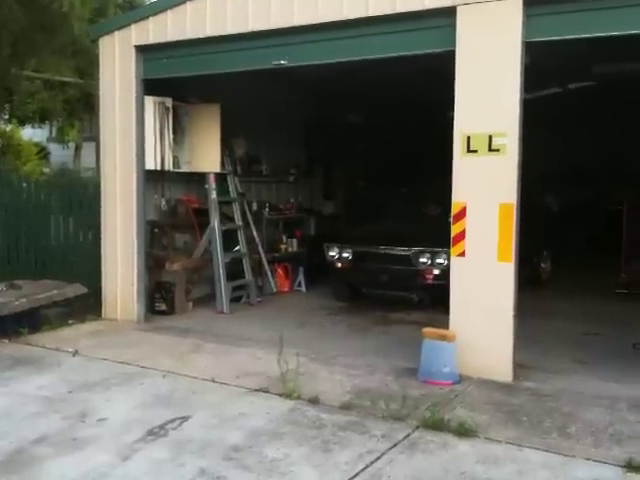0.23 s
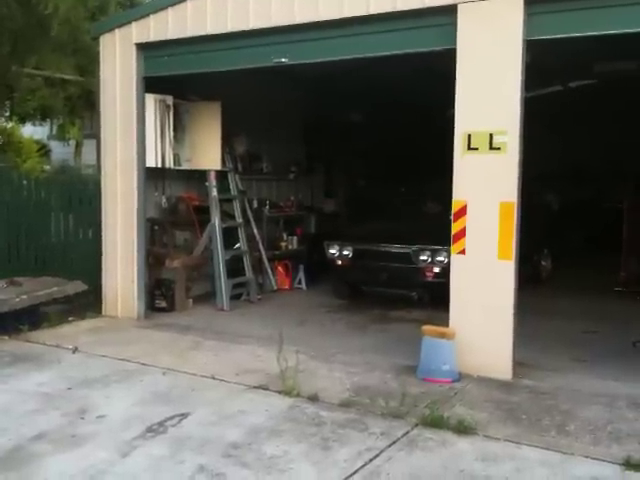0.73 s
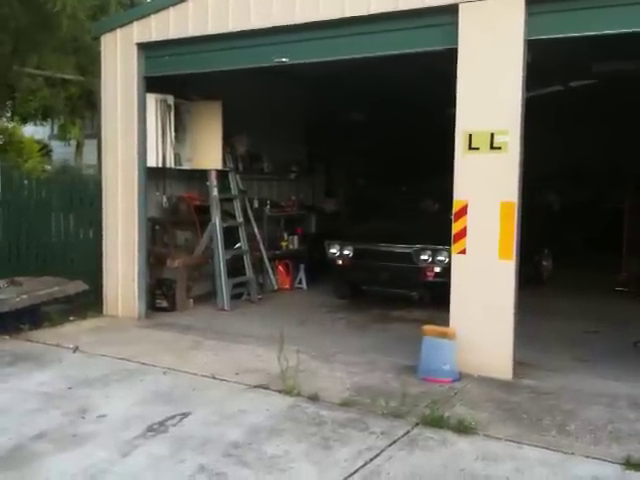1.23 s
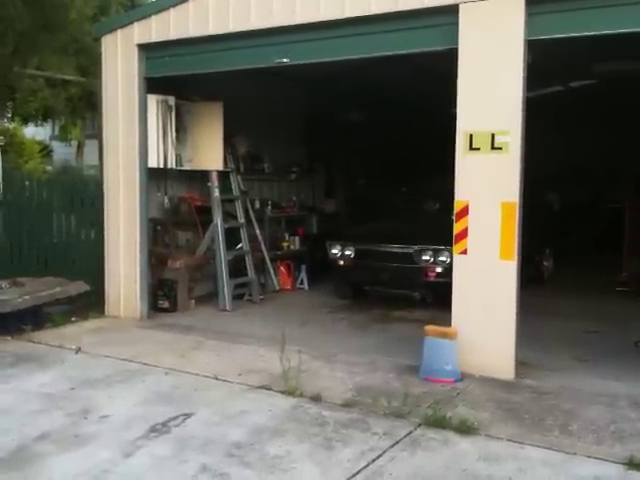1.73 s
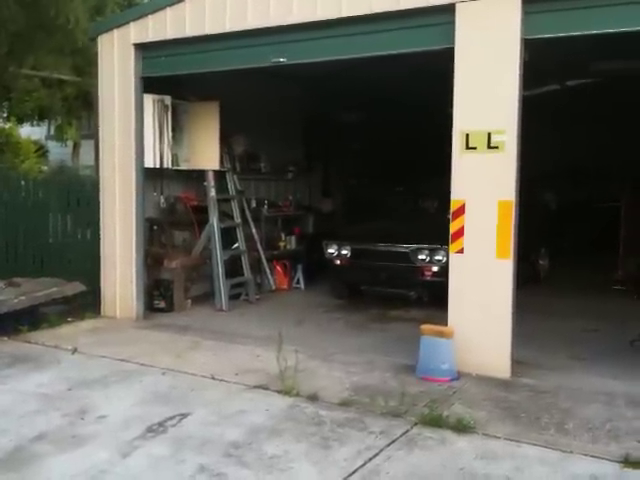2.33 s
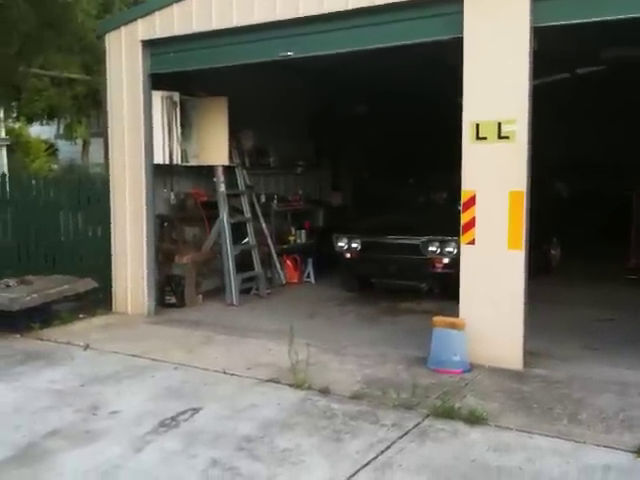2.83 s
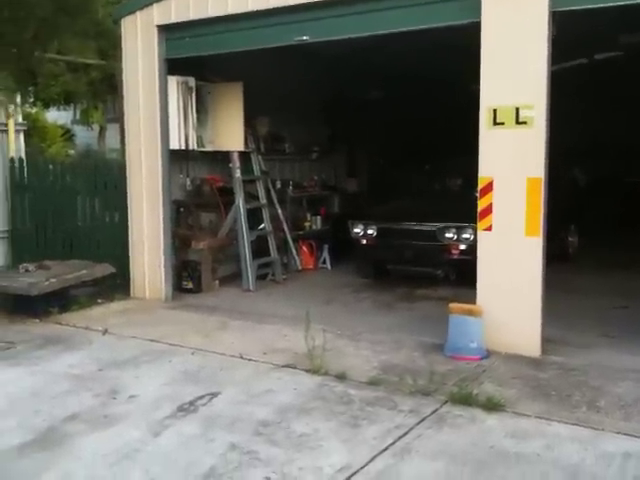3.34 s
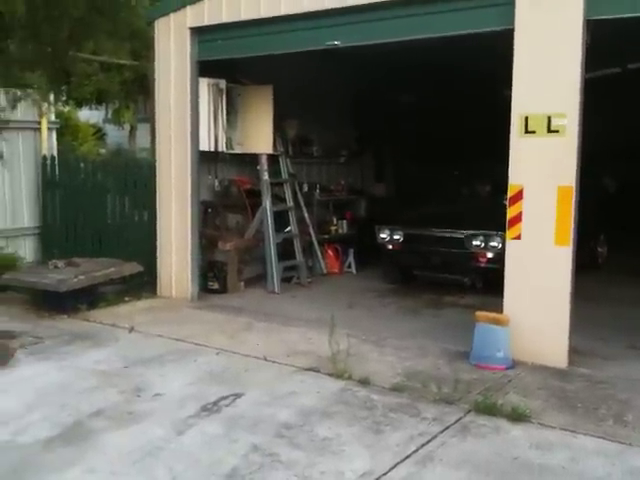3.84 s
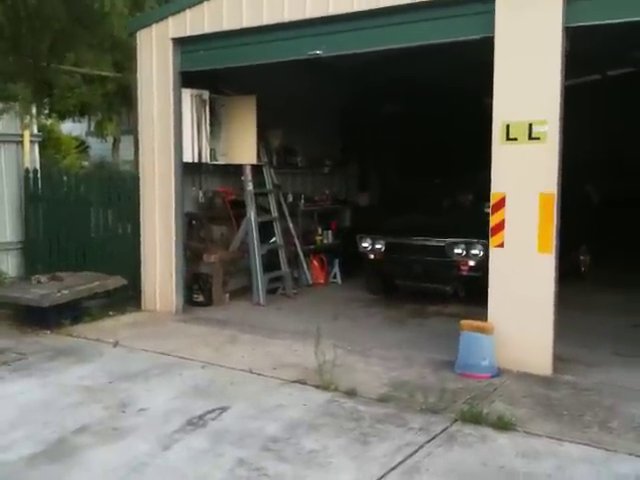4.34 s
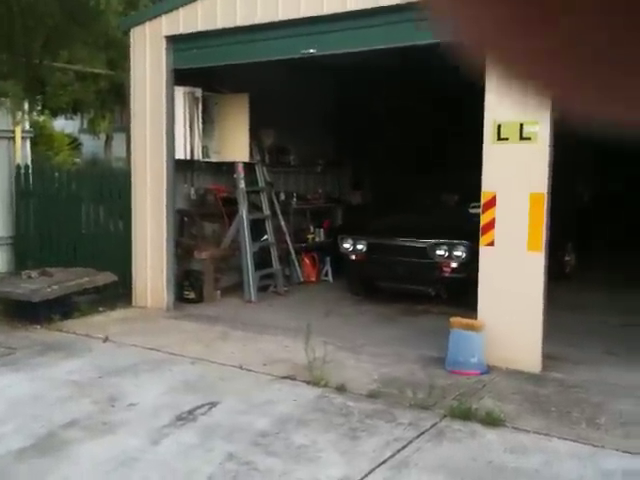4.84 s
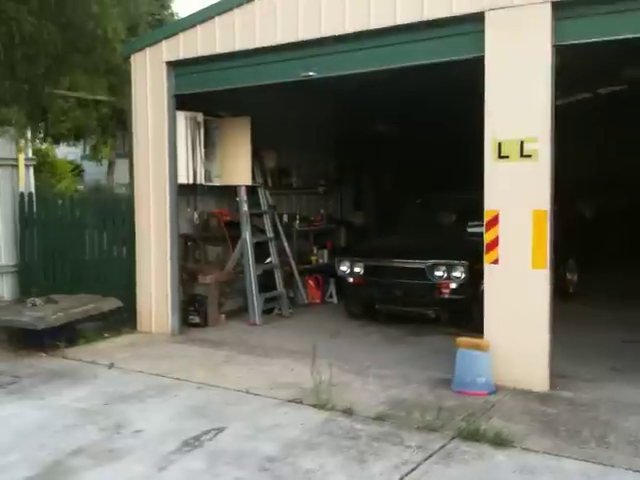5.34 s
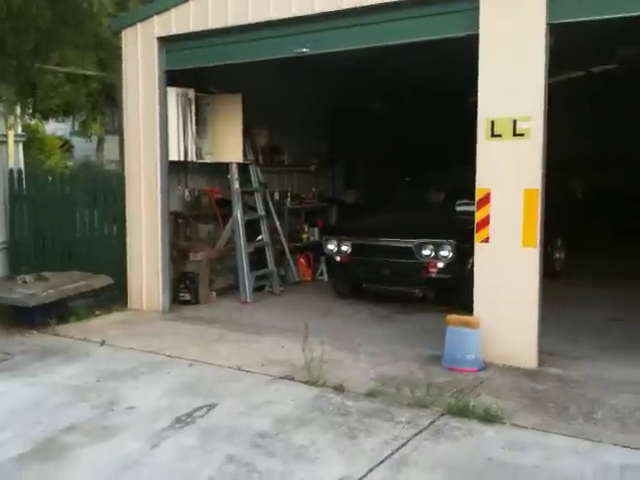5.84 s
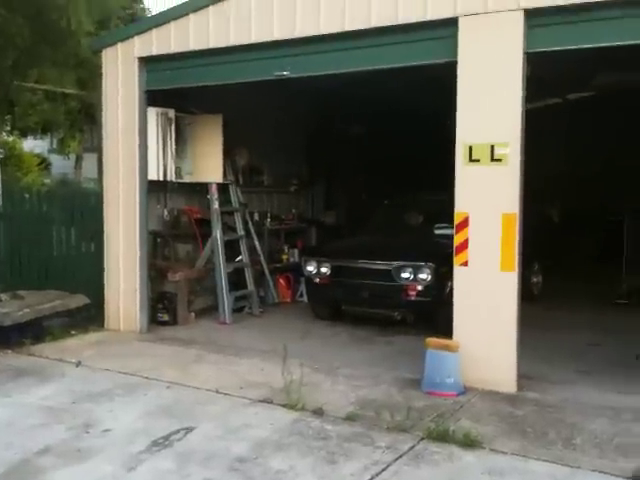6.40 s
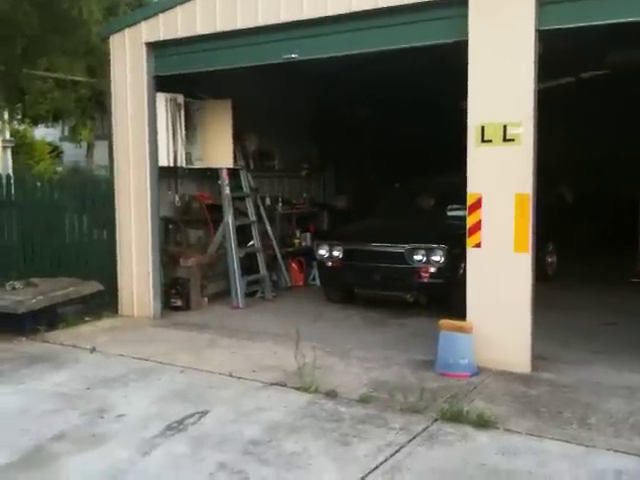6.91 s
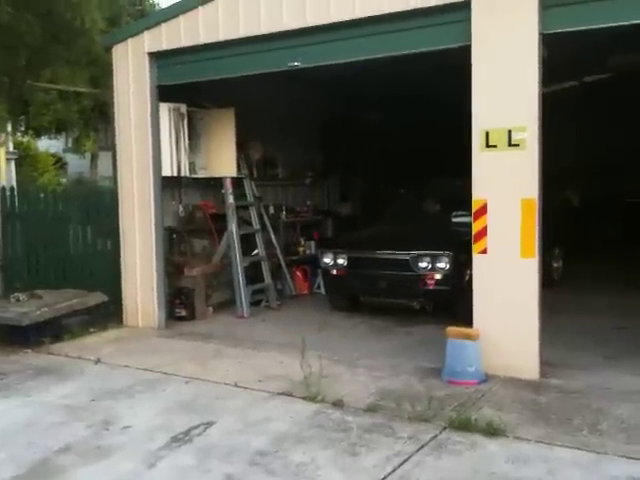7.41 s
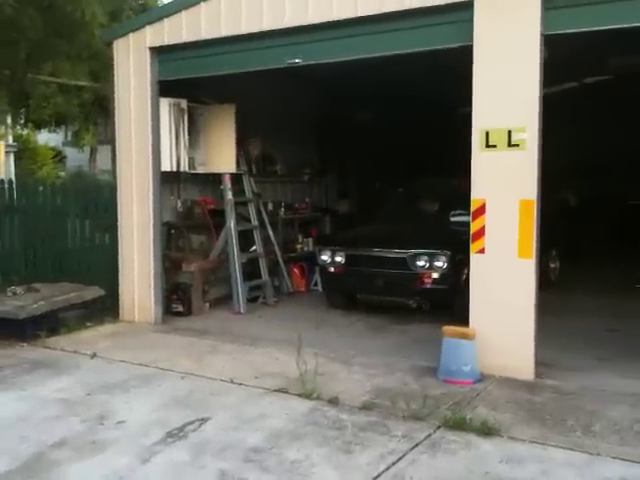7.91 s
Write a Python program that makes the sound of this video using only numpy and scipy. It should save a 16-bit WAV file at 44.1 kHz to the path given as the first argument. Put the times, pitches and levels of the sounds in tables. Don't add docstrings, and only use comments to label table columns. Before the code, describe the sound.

From a driveway, a small overloaded microphone picks up ragged exhaust bangs, deep pipe drone and sharp hiss echoing off metal walls. The engine falters, gives a late pop and dies to quiet yard air with a thin electric pump hum. Dry relay ticks follow, then a clashing starter grinds and whines through weak chuffs, until firings burst out, crowd together and settle into a rough lope.

```python
import sys
import numpy as np
from scipy import signal
from scipy.fft import rfft, irfft, next_fast_len
from scipy.io import wavfile
from scipy.ndimage import uniform_filter1d, map_coordinates

SR = 44100
rng = np.random.default_rng(int(sys.argv[2]) if len(sys.argv) > 2 else 0)


def amp(db):
    return 10 ** (np.asarray(db, float) / 20)


def write(x):
    x = np.atleast_2d(x).T
    wavfile.write(sys.argv[1], SR, np.round(np.clip(x, -1, 1) * 32767).astype(np.int16))


N = 359856
TIME = np.arange(N) / SR
LEAD = SR // 10


def unit(x):
    return x / np.sqrt(np.mean(x ** 2) + 1e-20)


def along(points, hz):
    f, value = np.transpose(points)
    return np.interp(np.log(hz + 1), np.log(f + 1), value)


def curves(table):
    silence = [-120] * (len(table[0]) - 1)
    before = (table[0][0] - .01, *silence)
    after = (table[-1][0] + .1, *silence)
    s, *columns = np.transpose([before, *table, after])
    return [np.interp(TIME, s, column) for column in columns]


def wobble(rate):
    coarse = TIME[::32]
    knots = rng.standard_normal(int(N * rate / SR) + 4)
    return np.interp(TIME, coarse, map_coordinates(knots, [coarse * rate]))


def filtered(x, response):
    m = next_fast_len(N + SR // 4, True)
    return irfft(rfft(x, m) * response(np.fft.rfftfreq(m, 1 / SR)), m)[:N]


def modes(table):
    def response(f):
        total = 0
        for k, (centre, width, db) in enumerate(table):
            ringing = 1j * f * width / (centre * centre - f * f + 1j * f * width)
            total = total + (-1) ** k * amp(db) * ringing
        return total
    return response


def noise(spectrum, peaks=None, peak_db=0, patchy_db=0):
    z = signal.stft(rng.standard_normal(N), nperseg=512)[2]
    field = uniform_filter1d(rng.standard_normal(z.shape), size=5, axis=0)
    field = uniform_filter1d(field, size=7, axis=1)
    patchy = signal.istft(z * amp(patchy_db * unit(field)), nperseg=512)[1][:N]

    def colour(hz):
        lift = 1 + amp(peak_db) * np.abs(modes(peaks)(hz)) if peaks else 1
        return amp(along(spectrum, hz)) * lift
    return unit(filtered(patchy, colour))


def strikes(s, db, size=0):
    at = np.round(np.asarray(s) * SR).astype(int) + size
    return np.bincount(np.maximum(at, 0), amp(db) * (at >= 0), N + size)[:N + size]


def spread_power(s, db, shape):
    return np.abs(signal.fftconvolve(strikes(s, 2 * db, size=LEAD), shape)[LEAD:N + LEAD])


def bursts(s, db, t60):
    return np.sqrt(spread_power(s, db, amp(-120 * TIME[:SR] / t60)))


def buildup(s, db, rise, t60, swing):
    t = TIME[:SR]
    shape = (1 - np.exp(-t / rise)) * amp(-120 * t / t60)
    return spread_power(s, db, shape / shape.max()) ** (swing / 2)


def volleys(table, count):
    rows = []
    for first, last, db, gas_db, end_db in table:
        rows.extend(np.linspace((first, db, gas_db), (last, db, end_db), count))
    return rows


# (time [s], bang [dB], gas [dB])
LONE_FIRINGS = [(-.02, 3, -5.5), (2.3506, -10.5, -27.5), (8.14, -4, -16), (7.552, -9.5, -15),
                (.735, -6, -14.5), (4.5, -38, -35), (.0545, -5, -14.5), (.2461, -19, -25),
                (.4906, -20.5, -33), (.7546, -17, -14.5), (.7918, -4, -12.5), (1.5031, -8, -13.5),
                (1.9209, -14.5, -21.5), (2.0689, -16.5, -18), (3.244, -12, -15), (3.3231, -27, -25.5),
                (3.475, -21.5, -19.5), (4.1436, -12, -15.5), (4.2099, -19.5, -27), (4.3822, -16.5, -19.5),
                (4.4322, -28.5, -29), (6.9757, -29, -41.5), (7.0525, -23, -43), (7.102, -17.5, -39),
                (7.1479, -13, -28), (7.181, -22.5, -31.5), (7.3525, -4, -24)]
# (first time [s], last time [s], bang [dB], gas at first [dB], gas at last [dB])
PAIRS_OF_FIRINGS = [(.0885, .1265, -17.5, -15.5, -24), (.182, .2126, -4, -13.5, -15.5),
                    (.5593, .5908, -5.5, -15, -15.5), (.8392, .8793, -18, -20.5, -28),
                    (1.0999, 1.158, -3.5, -11.5, -9), (1.1904, 1.2399, -17.5, -12, -28.5),
                    (1.3195, 1.3866, -7, -15.5, -16.5), (1.417, 1.4461, -6, -11.5, -12.5),
                    (1.5346, 1.5762, -13, -18.5, -30.5), (1.6604, 1.729, -3.5, -12, -10),
                    (2.4198, 2.492, -6.5, -15, -12.5), (2.9203, 2.9485, -22.5, -27.5, -29.5),
                    (3.6146, 3.6485, -7, -12.5, -17), (4.0378, 4.1098, -6, -12.5, -13.5),
                    (4.2721, 4.3171, -18, -35.5, -27), (7.385, 7.4155, -7.5, -14, -15),
                    (7.5764, 7.6174, -6.5, -10, -20.5)]
THREES_OF_FIRINGS = [(.2734, .331, -4, -15, -11.5), (.3753, .4436, -22, -24, -35.5),
                     (.654, .709, -6, -16.5, -7.5), (.9477, 1.0715, -4.5, -15.5, -17.5),
                     (1.76, 1.883, -4, -13, -15), (1.975, 2.1053, -4, -11.5, -12),
                     (2.1358, 2.2573, -4.5, -14, -14), (2.7468, 2.8735, -5, -10, -12.5),
                     (2.98, 3.116, -5.5, -20, -16), (3.1477, 3.2764, -5.5, -11, -13),
                     (3.7202, 3.7893, -7, -14.5, -13.5), (3.8594, 4.0031, -5.5, -17.5, -14.5),
                     (7.2415, 7.3154, -9.5, -17, -26.5), (7.923, 7.9899, -7.5, -24.5, -15.5),
                     (8.02, 8.0809, -7, -18.5, -14.5)]
FOURS_OF_FIRINGS = [(2.5253, 2.7168, -5.5, -16.5, -15.5), (3.3814, 3.5811, -6.5, -19, -14.5),
                    (7.4478, 7.5275, -4, -14.5, -14), (7.6897, 7.835, -18.5, -36, -35.5)]


def firings():
    pairs = volleys(PAIRS_OF_FIRINGS, count=2)
    threes = volleys(THREES_OF_FIRINGS, count=3)
    fours = volleys(FOURS_OF_FIRINGS, count=4)
    return np.transpose([*LONE_FIRINGS, *pairs, *threes, *fours])


# (time [s], tilt from hiss to rasp [dB])
RICHNESS = [(0, 0.5), (.3, 0), (.5, 1), (.72, 0.5), (.9, 0.5), (1.15, 0.5), (1.45, 0.5), (2, 0.5), (2.5, 0),
            (3, 0), (3.3, -0.5), (3.7, -1), (4.2, -0.5), (4.5, -2), (7.1, -0.5), (7.4, 0.5), (7.6, 2.5),
            (7.8, 1.5)]


def richness():
    return amp(np.interp(TIME, *np.transpose(RICHNESS)))


# (frequency [Hz], level [dB per Hz])
BARK_COLOUR = [(190, -30.5), (330, -3.5), (566, -4.5), (692, 0.5), (879, -4), (1030, -7), (2160, -8),
               (3040, -11.5), (3600, -13), (4680, -42), (7920, -120)]
# (frequency [Hz], level [dB per Hz])
SPIT_COLOUR = [(1760, -34), (3000, -21.5), (3940, -3), (4290, 0.5), (4830, 2.5), (6860, -2), (7720, -1),
               (12300, -12), (15100, -16.5), (16000, -41)]
# (frequency [Hz], width [Hz], level [dB])
PANEL_MODES = [(436, 27, 3), (705, 50, -6), (865, 30, 5), (1505, 160, 3), (2200, 97, -3)]


def torn_gas(s, gas_db):
    rich = richness()
    ragged = amp(1.4 * wobble(70))
    rasp = amp(-5) * buildup(s, gas_db, rise=0.015, t60=0.53, swing=1.564)
    hiss = amp(-12.5) * buildup(s, gas_db, rise=0.06, t60=0.36, swing=1.056)
    bark_gain = bursts(s + .001, gas_db - 19.5, t60=0.22) + rasp
    spit_gain = bursts(s + .001, gas_db - 7.0, t60=0.29) + hiss
    bark = bark_gain * noise(BARK_COLOUR, PANEL_MODES, peak_db=-4.5, patchy_db=3.5)
    spit = spit_gain * noise(SPIT_COLOUR, patchy_db=3.0)
    return ragged * (rich * bark + spit / rich)


def crack(s, gas_db):
    def colour(hz):
        return amp(along(BARK_COLOUR, hz)) * (1 + amp(-2.5) * np.abs(modes(PANEL_MODES)(hz)))
    fronts = strikes(s - .01, gas_db + 38.0)
    return shed(filtered(fronts, colour), quick=0.6) * richness()


# (frequency [Hz], width [Hz], level [dB])
PIPE_MODES = [(115.2, 14, -25), (181, 22, -7.5), (225, 28, 3.5), (296.2, 37, 1), (360, 17, -20.5)]


def drone(s, db):
    def response(f):
        return modes(PIPE_MODES)(f) / (1 + 1j * f / 900)
    pipe = unit(filtered(rng.standard_normal(N), response))
    return amp(-16.5) * buildup(s, db, rise=0.018, t60=.4, swing=1.05) * pipe


# (time [s], peak level [dB])
CRANKING_PUFFS = [
    (6.4311, -35.5),
    (6.565, -29),
    (6.6841, -39),
    (6.8138, -36),
    (6.9124, -40),
    (7.0028, -38.5),
]


def boom(s, gas_db):
    swell = buildup(s, gas_db, rise=0.077, t60=1.0, swing=1.0)
    swell = swell + amp(3.5) * buildup(*np.transpose(CRANKING_PUFFS), rise=.08, t60=.9, swing=.9)
    return amp(-27.5) * swell * noise([(60, -38.5), (90, -16), (108, 6.0), (125, -2.5), (160, -43.5)])


def puffs():
    hiss = noise([(2500, -28), (5000, 2.5), (9000, -1.5), (15000, -13.5)])
    return bursts(*np.transpose(CRANKING_PUFFS), t60=0.27) * amp(-8.0) * hiss


# (time [s], level [dB])
LATE_POPS = [
    (4.377, -22),
    (4.7, -56),
    (4.76, -57),
    (4.82, -54),
    (4.865, -62),
]


def pops():
    colour = [(500, -16.5), (800, -7.0), (1450, 7.0), (2000, -5.0), (4000, -21)]
    return bursts(*np.transpose(LATE_POPS), t60=0.35) * noise(colour, patchy_db=4.0)


def exhaust():
    s, db, gas_db = firings()
    fired = drone(s, db) + boom(s, gas_db) + crack(s, gas_db) + torn_gas(s, gas_db)
    return fired + pops() + puffs()


# (time [s], peak level [dB])
COMPRESSIONS = [(4.689, -49), (4.75, -51.5), (4.81, -51), (4.86, -41), (4.878, -50), (6.319, -33),
                (6.351, -49), (6.442, -37.5), (6.574, -38), (6.681, -35), (6.787, -38.5), (6.902, -36)]
# (delay [ms], signed gain [ratio])
FRONT_ECHOES = [(3.0, 1.47), (10.0, 1.06), (14.8, 1.07), (19.3, 0.95), (23.9, -0.61), (28.8, -0.68),
                (41.1, 0.39), (46.8, -0.47), (55.4, -0.24), (61.5, 0.37), (88.7, -0.4), (97.3, 0.36),
                (108.2, 0.2)]
# (frequency [Hz], width [Hz], level [dB])
MOUTH_MODES = [(200, 110, 0)]


def thumps():
    s, db = firings()[:2]
    chuff_s, chuff_db = np.transpose(COMPRESSIONS)
    fronts = strikes(s, db + 41.0) + strikes(chuff_s - .011, chuff_db + 41.5)
    echoed = sum(gain * np.pad(fronts, (round(ms * SR / 1000), 0))[:N] for ms, gain in FRONT_ECHOES)
    return filtered(echoed, lambda f: modes(MOUTH_MODES)(f) ** 2 / (1 + (f / 420) ** 6))


# (time [s], level [dB])
STARTER_LEVEL = [
    (6.33, -30.5),
    (6.376, -42.5),
    (6.448, -37),
    (6.95, -40),
    (7.04, -43.5),
    (7.1, -36),
    (7.3, -31),
    (7.6, -23.5),
    (7.75, -45),
]
# (frequency [Hz], level [dB per Hz])
GEAR_COLOUR = [(180, -37), (300, -11.5), (326, 2.5), (360, -27.5), (528, -8.5), (762, -8), (842, -1.5),
               (1150, -11.5), (1410, 0), (1840, -10), (2930, -3), (10700, -19), (16000, -38)]
# (frequency [Hz], width [Hz], level [dB])
WHINE_TONES = [(1247, 40, 2), (1460, 32, -1.5), (2100, 66, 1.5), (2930, 56, 4), (3455, 60, -6)]
# (time [s], level [dB])
PINION_CLUNKS = [
    (6.299, -37),
    (6.306, -27),
    (6.318, -23.5),
    (6.326, -27),
    (6.346, -32),
    (6.431, -32),
]
# (frequency [Hz], width [Hz], level [dB])
BELL_MODES = [(730, 200, 2), (1460, 320, 6), (2160, 230, 5.5), (5350, 510, 2.5), (6700, 600, -5)]


def starter():
    s, db = np.transpose(PINION_CLUNKS)
    clash = bursts(s, db, t60=0.1) * unit(filtered(rng.standard_normal(N), modes(BELL_MODES)))
    speed = 1 + 0.036 * wobble(9.1)
    tones = 0
    for hz, width, tone_db in WHINE_TONES:
        turns = hz * np.cumsum(speed + .008 * wobble(2 * width)) / SR
        tones = tones + amp(tone_db + 4.6 * wobble(18)) * np.sin(2 * np.pi * turns)
    meshed_db = np.interp(TIME, [6.85, 7.0], [0, -20])
    sag_db, sag_s = 2.5, .015
    labour_db = sag_db * sum(np.exp(-((TIME - at) / sag_s) ** 2) for at, _ in COMPRESSIONS)
    level = amp(curves(STARTER_LEVEL)[0] - labour_db + 1.4 * wobble(40))
    return clash + level * (noise(GEAR_COLOUR, patchy_db=3.5) + amp(meshed_db - 13.5) * tones)


# (time [s], peak level [dB], thud [dB])
KEY_TICKS = [
    (6.1711, -34, -18.5),
    (6.1805, -35, -3.5),
    (6.2492, -36, -26),
    (6.2899, -34.5, -11),
]


def relays():
    s, db, thud_db = np.transpose(KEY_TICKS)
    tick = bursts(s, db - 1.5, t60=.006) * noise([(500, -7.5), (3000, 0.5), (14000, -0.5)])
    thud = bursts(s, db + thud_db, t60=.03) * noise([(80, -21.5), (250, 0.5), (1000, -4.5), (2500, -24)])
    return tick + thud


# (time [s], stroke rate [Hz], level [dB])
PUMP_RUN = [
    (4.6, 39.53, -72),
    (4.9, 39.53, -62),
    (5.48, 39.53, -62),
    (5.62, 38.5, -78),
    (6.2, 38.5, -90),
]
# (frequency [Hz], level [dB per Hz])
PUMP_COLOUR = [(59, -35.5), (100, -13.5), (151, -3.5), (321, -9), (544, -7), (976, -6.5), (1130, -10),
               (1720, -10.5), (2910, -21), (4840, -15), (9000, -24.5), (11700, -49), (19800, -120)]
# (frequency [Hz], level [dB])
PUMP_ORDERS = [(156.1, -68), (317.6, -68), (430.7, -76), (473.7, -77), (710.6, -72.5), (947.5, -67),
               (1287, -73.5), (1421, -76), (1502, -76.5), (1540, -78), (1658, -74.5), (1701, -73.5),
               (1895, -77.5), (1933, -76.5)]


def pump():
    stroke_hz, db = curves(PUMP_RUN)
    turns = np.cumsum(np.abs(stroke_hz)) / SR
    strokes = np.diff(np.floor(turns), prepend=0)

    def spread(hz):
        smear = np.exp(1j * hz * hz / 9000)
        return amp(along(PUMP_COLOUR, hz)) * smear / (1 + (hz / 2200) ** 6)
    orders = 0
    for hz, level in PUMP_ORDERS:
        order = round(hz / PUMP_RUN[0][1])
        orders = orders + amp(level + 67 + 2 * wobble(3.4)) * np.sin(2 * np.pi * order * turns)
    return amp(db) * (.6 * unit(filtered(strokes, spread)) + 0.67 * orders + 1.4 * noise(PUMP_COLOUR))


# (frequency [Hz], time to fall 60 dB [s])
SHED_RING = [(100, 0.54), (300, 0.55), (2000, 0.55), (8000, 0.58), (15000, 0.077)]


def shed(x, quick=1):
    hz, t, z = signal.stft(rng.standard_normal(SR), SR, nperseg=256)
    t60 = quick * along(SHED_RING, hz)[:, None]
    tail = signal.istft(z * amp(-60 * t / t60), SR, nperseg=256)[1]
    delayed = np.pad(x, (500, 0))
    return signal.fftconvolve(delayed, tail / np.linalg.norm(tail))[:N]


# (frequency [Hz], level [dB per Hz])
YARD_COLOUR = [(24, -54.5), (40, -27.5), (106, -2.5), (199, 0.5), (1150, -9.5), (1850, -8.5), (3300, -16),
               (5050, -11.5), (9690, -20), (11000, -20.5), (12800, -22), (14800, -21), (16000, -25.5)]


def yard():
    return amp(-62.5 - 0.5 + 1.2 * wobble(4)) * noise(YARD_COLOUR, patchy_db=0.5)


def scene():
    car = exhaust() + starter()
    low = thumps()
    echo = amp(-7.5) * shed(car + amp(-5.5) * low)
    return (car + low + echo + relays() + pump() + yard())[None]


def low_pass(x):
    return signal.sosfilt(signal.butter(12, 16620, fs=SR, output="sos"), x)


def record(dry):
    heard = filtered(dry[0], lambda hz: 1 / np.sqrt(1 + (85 / (hz + 1)) ** 6))
    squashed = heard / (1 + np.abs(heard / .75) ** 5) ** (1 / 5)
    mix = filtered(squashed, lambda hz: hz < 15830)[None]
    return low_pass(mix)


dry = scene()
out = record(dry)
write(out)
```